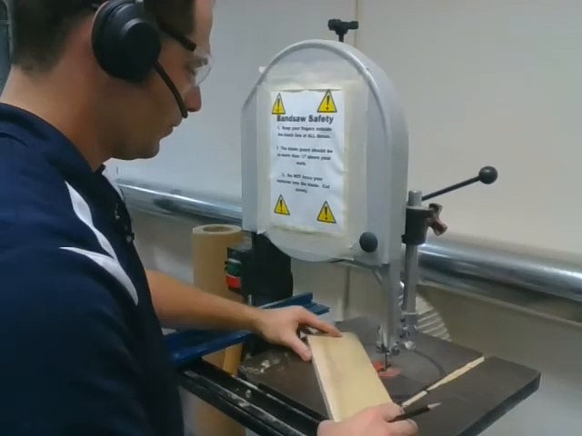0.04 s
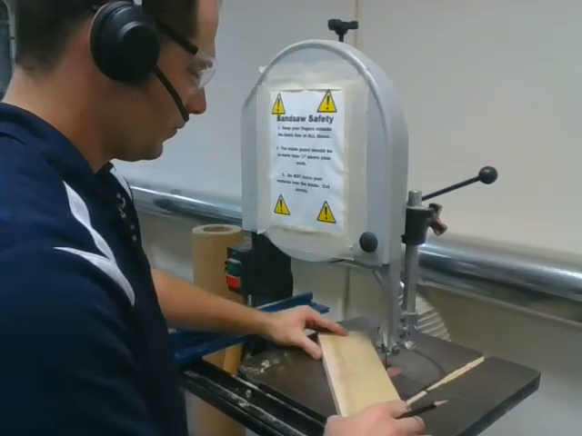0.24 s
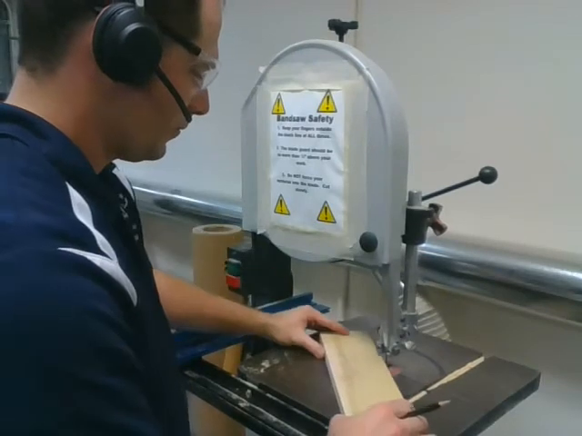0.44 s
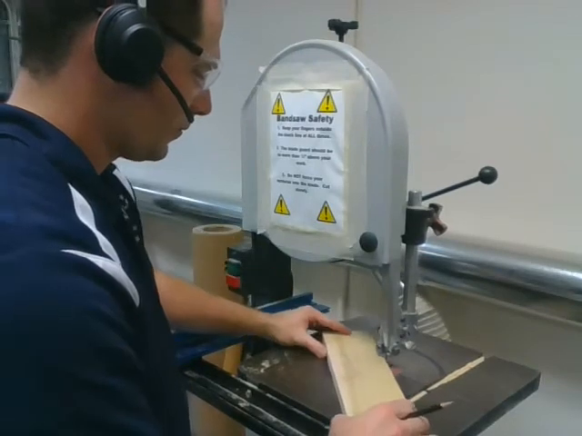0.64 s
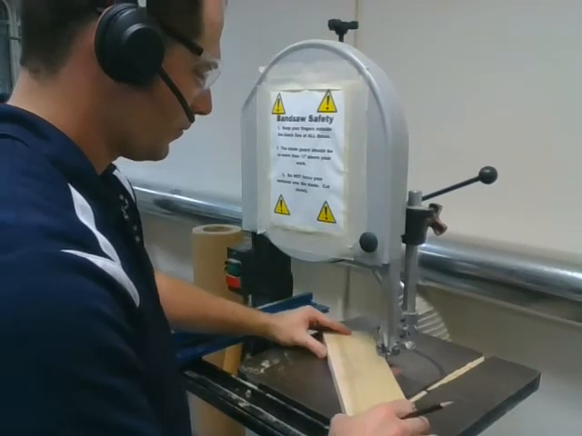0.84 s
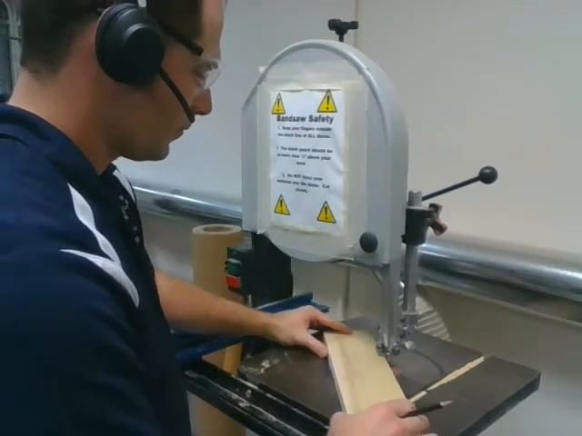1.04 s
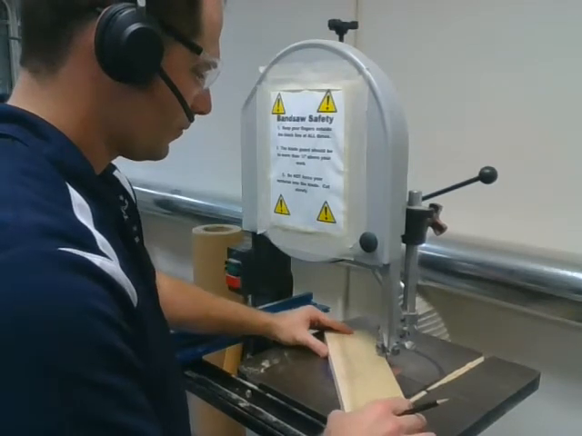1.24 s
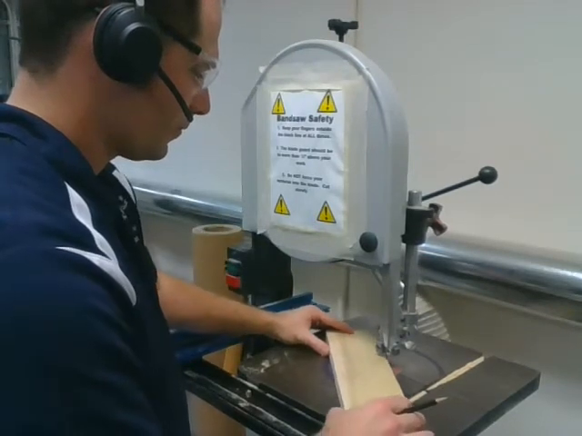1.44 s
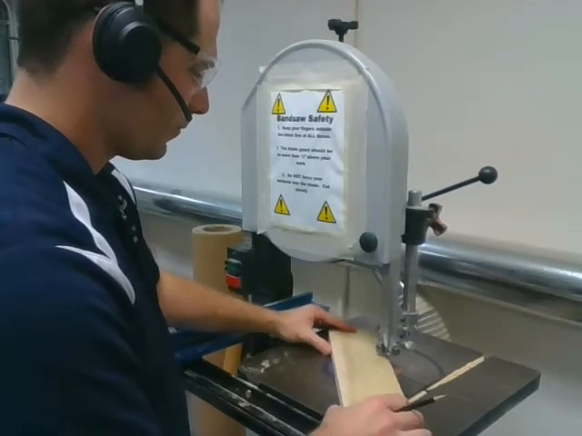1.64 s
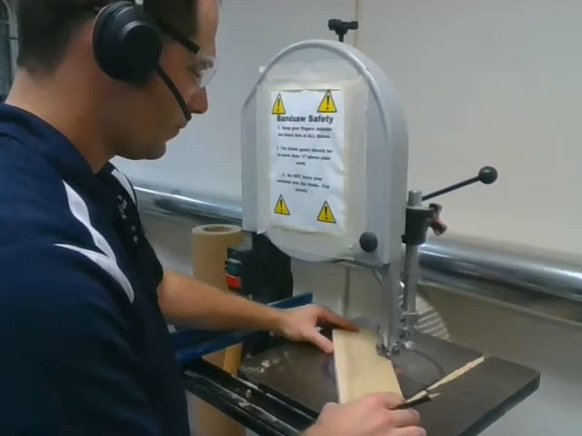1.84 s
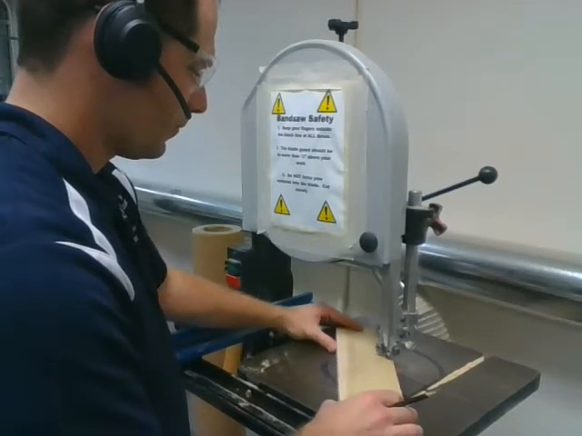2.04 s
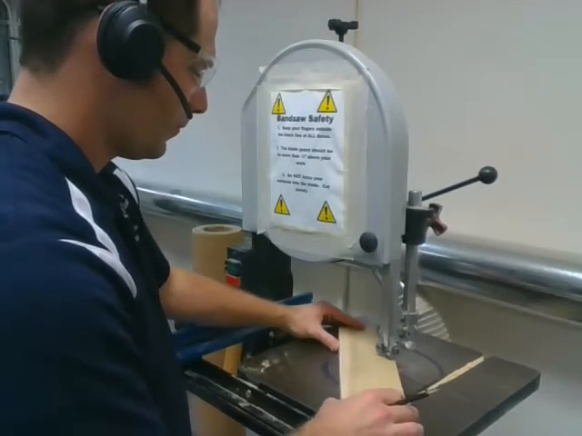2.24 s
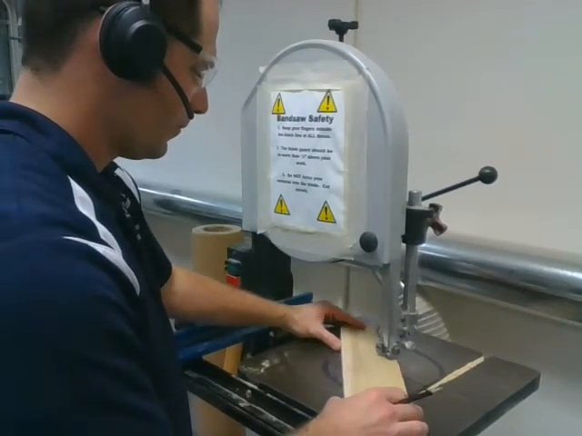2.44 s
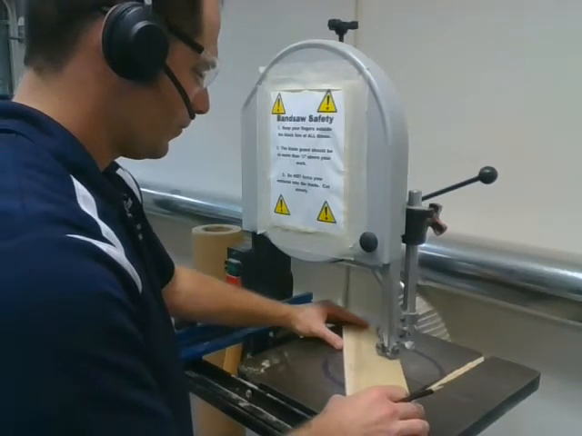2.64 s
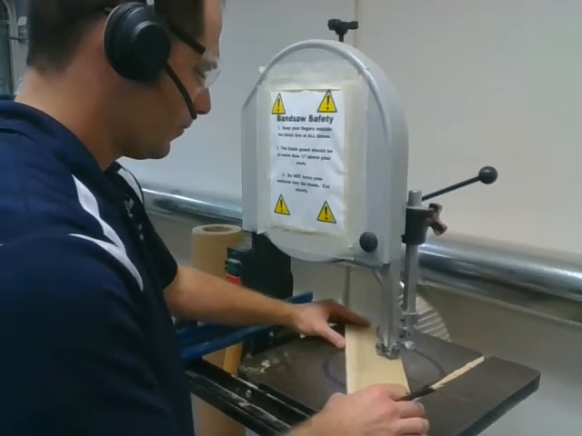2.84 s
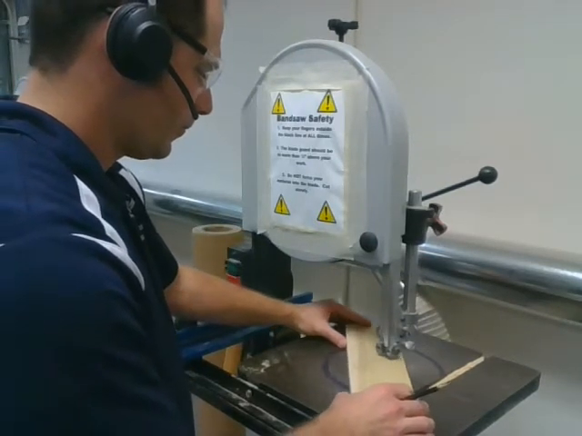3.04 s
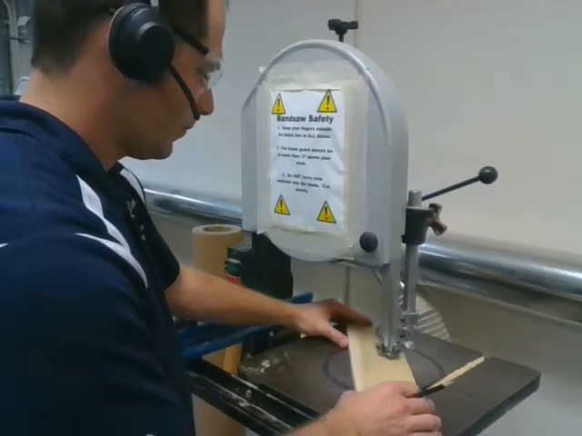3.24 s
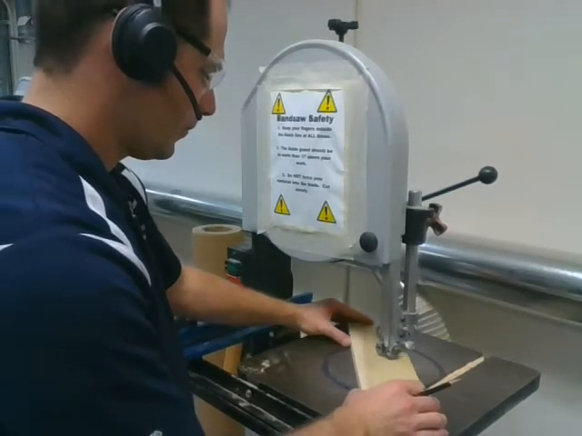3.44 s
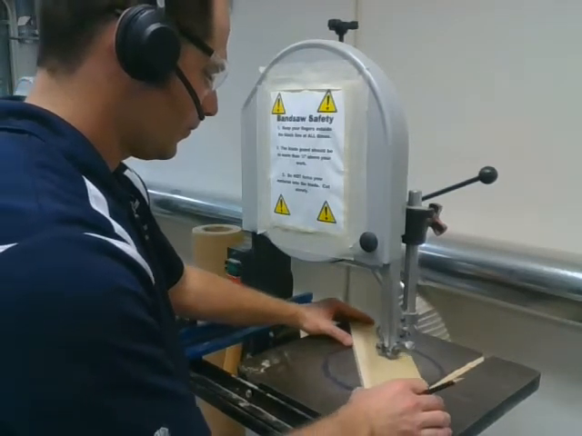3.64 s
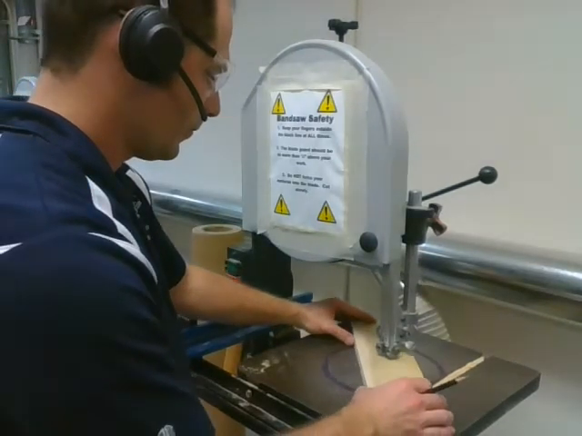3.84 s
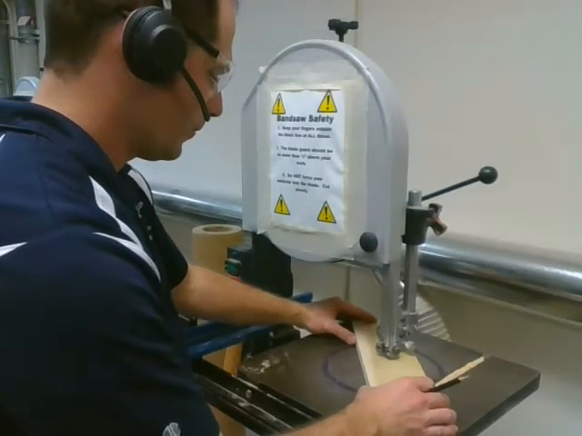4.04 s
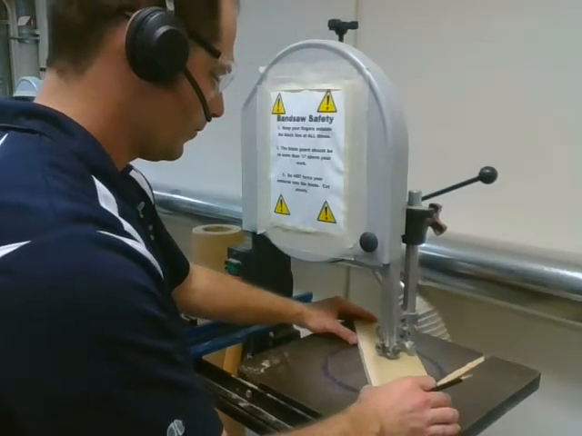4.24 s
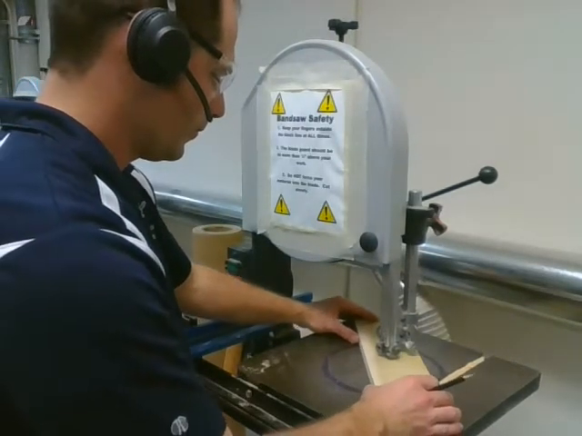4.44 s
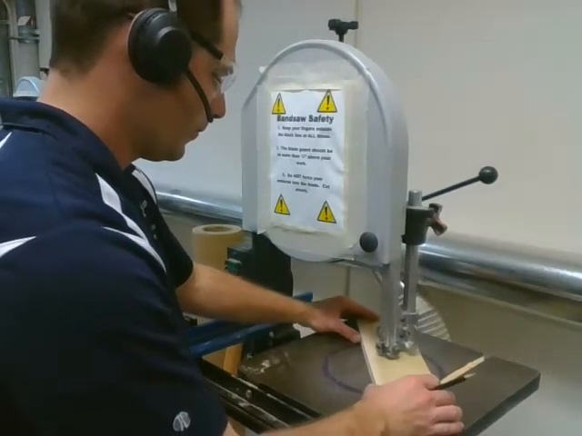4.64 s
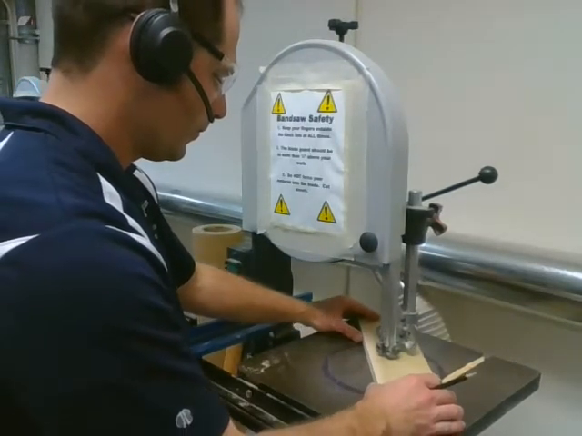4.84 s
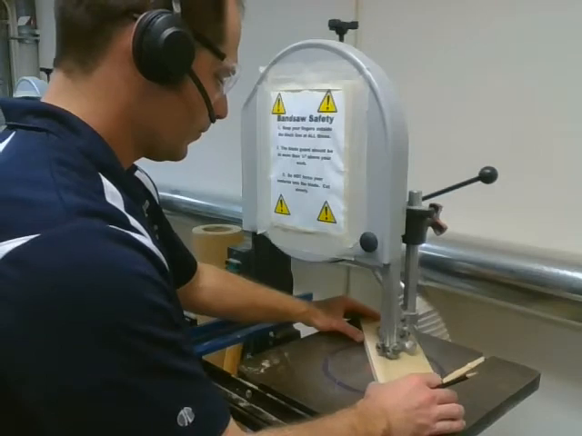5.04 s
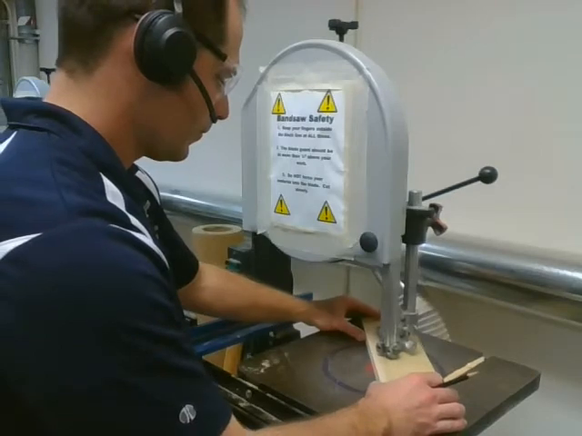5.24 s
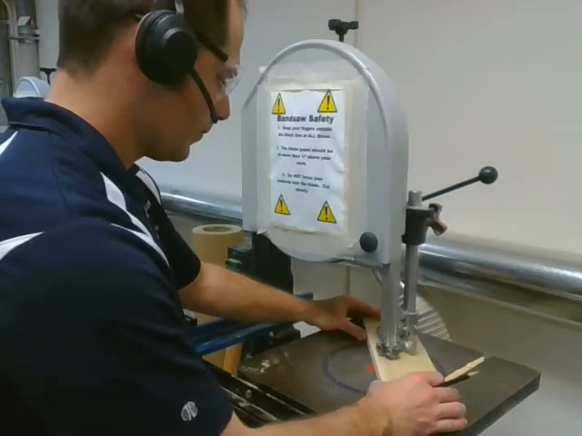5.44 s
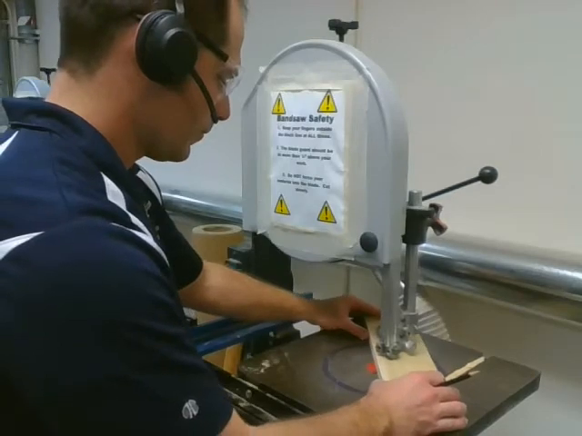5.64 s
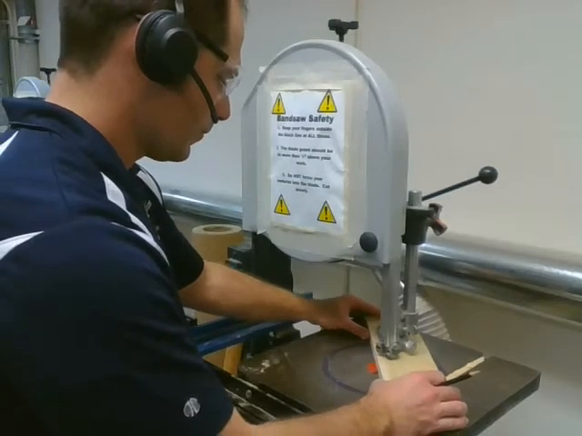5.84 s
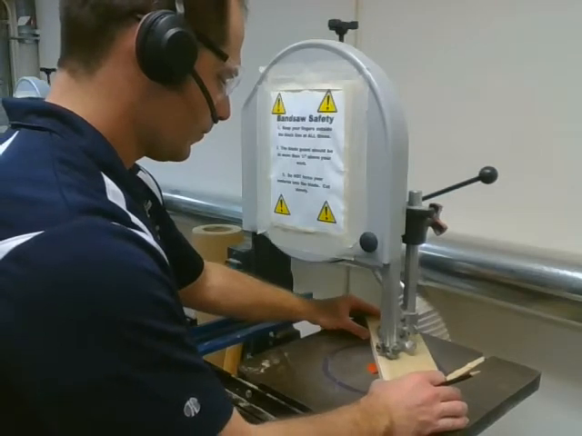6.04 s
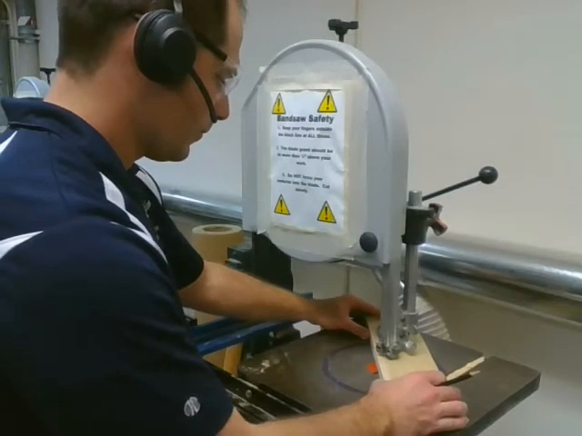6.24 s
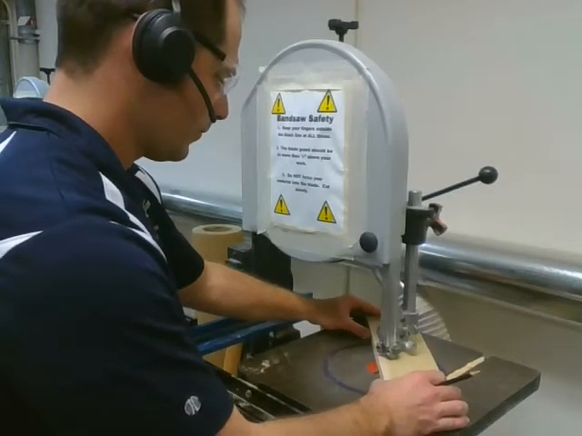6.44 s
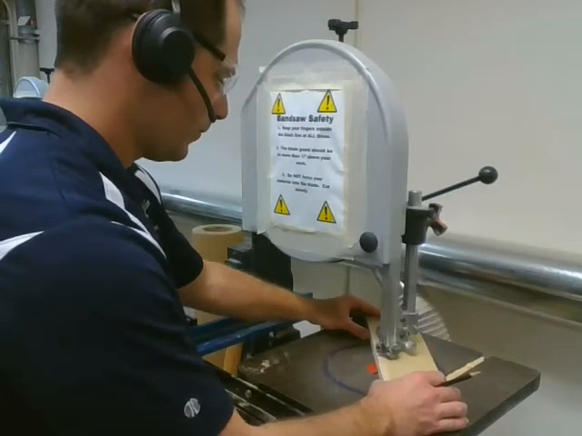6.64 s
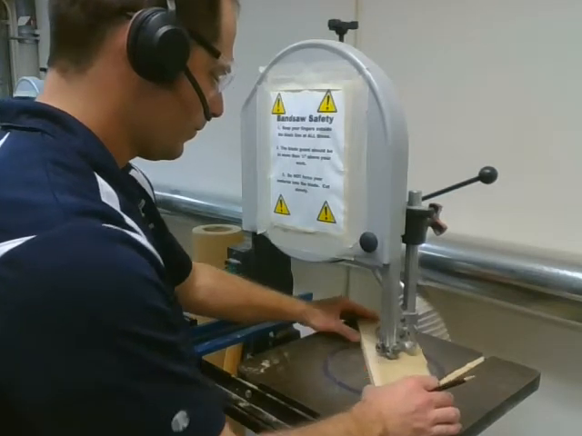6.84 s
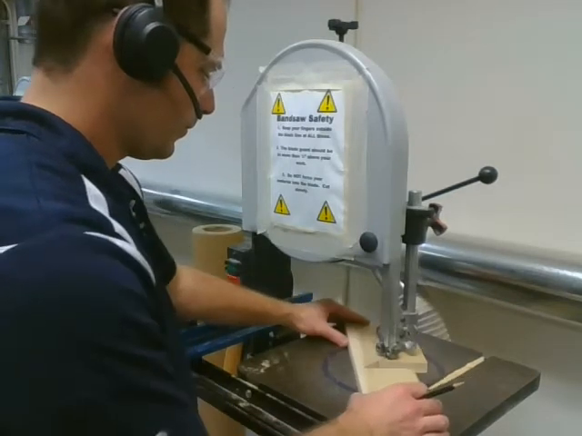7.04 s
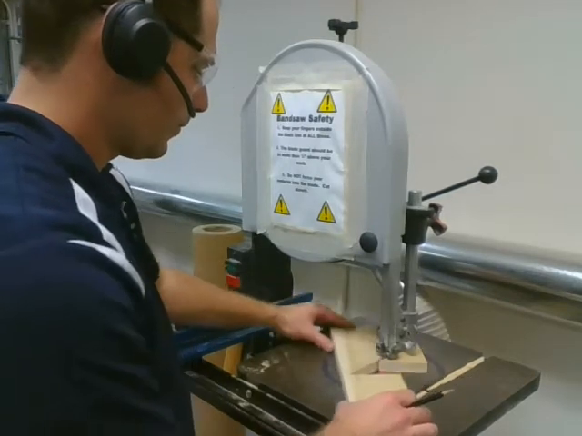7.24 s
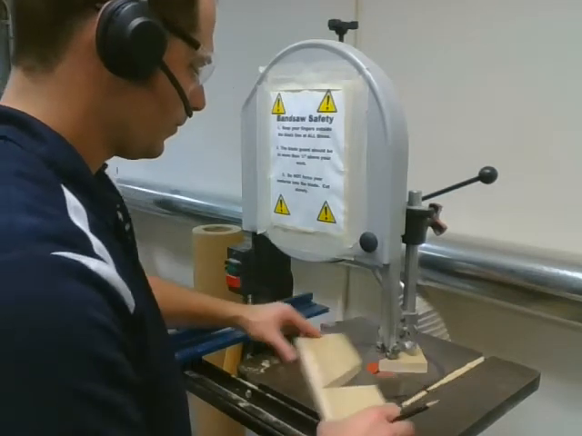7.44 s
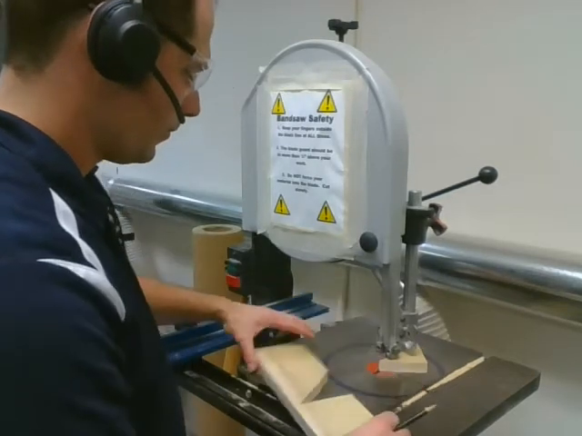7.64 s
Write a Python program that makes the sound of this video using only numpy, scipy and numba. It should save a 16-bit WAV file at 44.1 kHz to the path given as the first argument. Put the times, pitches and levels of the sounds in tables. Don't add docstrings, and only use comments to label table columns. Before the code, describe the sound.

For the first second a bandsaw idles faintly: muffled motor rumble, a mid whine, soft throbbing, and a few tiny chip ticks between 0.2 and 0.85. At about 1.0 the teeth touch a wooden board, and by 1.4 the cut is loud, a rough chattering rasp with ringing metallic resonances. Sharp catches crowd 1.45 to 2.3, with dull board thuds from 1.5 to 2.2, hardest near 2.07. The rasp dips, then surges around 2.9 to 3.7 over a low wooden drone. From 3.8 it eases to a thin singing hiss, the rumble nearly vanishing after 4.2, with stray snags. At 5.46 it abruptly roars back, scratchy and snagging, with a wavering high whistle swelling near 6.1 and fading by 6.5. Between 6.85 and 7.2 small squeaks mark the board pulling free; motor rumble remains until 7.7. The sound is close, thin and narrow-band.

```python
import sys
import numpy as np
from scipy import signal
from scipy.fft import rfft, irfft
from scipy.io import wavfile
from scipy.ndimage import uniform_filter1d
from numba import njit

SR = 44100
rng = np.random.default_rng(int(sys.argv[2]) if len(sys.argv) > 2 else 0)


def ratio(d):
    e = np.asarray(d, float) / 20
    return 10 ** e


def unload_wav(signal):
    wavfile.write(
        sys.argv[1],
        SR,
        np.round(np.clip(np.atleast_2d(signal).T, -1, 1) * 32767).astype(np.int16),
    )


N = 339761
T = np.arange(N) / SR
CUT_START_S, SECOND_PUSH_S = 0.98, 5.46


def level(x):
    return x / np.sqrt(np.mean(x ** 2))


def read(table):
    s, *columns = np.transpose(table)
    return [np.interp(T, s, c) for c in columns]


@njit
def svf(x, hz, width_hz):
    y, band, low = np.empty(len(x)), 0., 0.
    for i in range(len(x)):
        g, k = np.tan(np.pi * hz[i] / SR), width_hz / hz[i]
        v = (band + g * (x[i] - low)) / (1 + g * (g + k))
        band = 2 * v - band
        low += 2 * g * v
        y[i] = k * v
    return y


def ring(x, hz, width_hz):
    hz = hz * np.ones(N)
    return svf(svf(x, hz, 1. * width_hz), hz, 1. * width_hz)


def tone(hz):
    return np.sin(2 * np.pi * np.cumsum(hz) / SR)


def coloured(x, spectrum):
    hz, db = np.transpose(spectrum)
    log_hz = np.log(np.fft.rfftfreq(N, 1 / SR) + 1)
    gain = ratio(np.interp(log_hz, np.log(hz), db, left=-120, right=-120))
    return level(irfft(rfft(x) * gain, N))


def highpass(x, hz):
    return signal.sosfilt(signal.butter(2, hz, "high", fs=SR, output="sos"), x)


def walk(rate_hz):
    k = int(SR / rate_hz)
    held = np.repeat(rng.standard_normal(N // k + 1), k)
    return level(uniform_filter1d(uniform_filter1d(held, k), k)[:N])


def blows(events, rise_s, grit_share, grit_hz, db_up):
    out = np.zeros(N + SR)
    t = np.arange(SR // 25) / SR
    shape = t / rise_s * np.exp(1 - t / rise_s)
    grit = level(ring(rng.standard_normal(N), grit_hz, 1.1 * grit_hz))
    for s, db, hz in events:
        i = int(s * SR)
        body = np.sin(2 * np.pi * hz * t) + grit_share * grit[i:i + len(t)]
        out[i:i + len(t)] += ratio(db + db_up) * shape * body
    return out[:N]


def wheel():
    turn_hz, top_s = 5.22, 2.81
    return np.cos(2 * np.pi * turn_hz * (T - top_s))


# (time [s], extra feed [dB], length [s])
LURCHES = [(1.49, 3, .03), (2.063, 6.5, 0.039), (2.934, 5.5, 0.032), (3.08, 0.5, 0.036), (3.195, -3, .04),
           (3.227, 3, 0.017), (3.583, -3, 0.089), (3.692, 3, 0.0092), (5.48, 5, .01), (6.842, 5, .05),
           (6.92, -11, 0.023), (7.218, 4.5, 0.017)]


def lurch_db():
    return sum(db * np.exp(-((T - s) / length_s) ** 2) for s, db, length_s in LURCHES)


# (time [s], feed pressure as blade level [dB], span ring [Hz],
# lean on guide [dB], song share [dB])
FEED = [(0.98, -83, 2755, 3, -8), (1.12, -48, 2720, -5.5, -3.5), (1.4, -32.5, 2750, 1.5, -5),
        (1.79, -32, 2730, 1.5, -5), (2.06, -32, 2710, -1, -4), (2.35, -37, 2670, -2.5, -1.5),
        (2.78, -40, 2670, -14, -2.5), (2.95, -36, 2673, -13.5, 1), (3.47, -32.5, 2657, -15, -5.5),
        (3.84, -45, 2730, -18, -7), (4.39, -52.5, 2850, 2, -1), (4.84, -48, 3010, -1, -1.5),
        (5.45, -45, 2533, -3, -2.5), (5.47, -34.5, 2560, -4.5, 3.5), (5.84, -32.5, 2580, -2.5, 5),
        (6.07, -39.5, 2825, -6, 0.5), (6.42, -41.5, 2745, -3, -1), (6.72, -50.5, 2894, -6, -7.5),
        (7.03, -41, 2740, -14.5, -17),
    (7.19, -44.5, 2735, -7.5, -17),
    (7.25, -64.5, 2550, -7, 3.5),
    (7.7, -77.5, 2570, -4.5, 11),
]


def cut():
    feed_db, span_hz, lean_db, song_db = read(FEED)
    lurch = lurch_db()
    return feed_db + lurch, span_hz, lean_db, feed_db + 0.72 * lurch + song_db


# (time [s], level [dB])
RASP = [(0.98, -99), (1.12, -60.5), (2.1, -50.5), (2.46, -55.5), (4.4, -56.5), (5.45, -54), (5.46, -34),
        (5.85, -28.5), (6.06, -35.5), (6.45, -37.5), (6.56, -39), (6.61, -46.5), (7.7, -59)]


def rasp_db():
    return read(RASP)[0]


# (time [s], rumble [dB], bass share [dB])
GATE = [(0.0, -66.5, -18), (0.62, -63, -19), (1.09, -69.5, -34), (1.33, -57.5, -29), (1.5, -52.5, -13),
        (1.77, -52.5, -7), (2.07, -47, -10), (2.69, -52.5, -10), (2.92, -45, -8.5), (3.29, -46, -13.5),
        (3.92, -56.5, -14.5), (4.16, -60.5, -14), (4.18, -76, -13), (5.2, -80.5, -20), (5.45, -80, -22),
        (5.46, -47.5, -15.5), (5.9, -46, -15), (7.7, -48, -31)]


def gate():
    return read(GATE)


# (frequency [Hz], level [dB per Hz])
RUMBLE = [(180, -34.5), (300, -9), (329, -16.5), (455, -6), (534, -3.5), (589, -5), (739, -3.5),
          (928, -5.5), (1300, -14.5), (1690, -60.5), (2860, -120)]
BASS = [(15, -42.5), (25, -31), (70, -31), (113, -20), (146, -19.5), (189, -15), (290, -4.5), (380, -35.5),
        (640, -120)]
IDLE_HISS = [(710, -31), (1200, -11), (1950, -9), (2130, -21.5), (2380, -9.5), (3020, -9.5), (3500, -14),
             (4210, -14.5), (5290, -27), (7000, -27), (9100, -58.5), (15400, -120)]
# (frequency [Hz], level [dB], width [Hz])
WHINE = [(538.4, -1.5, 4.8), (716, -4, 28), (760, -9, 31), (936.4, -4.5, 18)]


def machine():
    rumble_db, bass_db = gate()
    second_push = T > SECOND_PUSH_S
    flutter_db = 2.5 * (rumble_db < -74)
    throb_hz, throb_peak_s, bite_s = 4.15, 0.2, 1.12
    throb_db = 2.5 * np.cos(2 * np.pi * throb_hz * (T - throb_peak_s)) * (T < bite_s)
    noise = rng.standard_normal((4, N))

    sway_db = (2.5 - 1.1 * second_push + flutter_db) * walk(11)
    rumble = ratio(sway_db + 0.2 * wheel() + throb_db) * coloured(noise[0], RUMBLE)

    whine = sum(ratio(db + 1.5 * flutter_db * walk(10)) * level(ring(noise[1], hz, width_hz))
                for hz, db, width_hz in WHINE)
    whine = whine + 0.5 * ratio(flutter_db * walk(9)) * tone(540 + 1.57 * walk(4))

    hum_db = -19 - 16 * second_push + 1.5 * walk(5)
    hum = np.sin(2 * np.pi * 120 * T) * ((1 + wheel()) / 2) ** 2 * ratio(hum_db)
    bass = ratio(3.6 * walk(14)) * coloured(noise[2], BASS)
    hiss = ratio(-12 + 1.1 * walk(45)) * coloured(noise[3], IDLE_HISS)

    buzz_db = -7.5 + 0.5 * cut()[3] + 0.5 * rasp_db()
    buzz = ratio(buzz_db - 3) * level(ring(noise[1], 1343, 330))
    mix = rumble + ratio(-5 + 1.1 * throb_db) * whine + ratio(bass_db) * bass + hum + ratio(0.35 * throb_db) * hiss
    return ratio(rumble_db - 1.5) * mix + buzz


def board():
    swell_s, rise_s, stop_s = 3.094, 0.43, 4.83
    sag_db_s, damp_db_s = 10.5, 116
    late_s = T - swell_s
    fall_db = np.where(late_s < 0, 10 * (late_s / rise_s) ** 2, sag_db_s * late_s)
    swell_db = -49 - fall_db - damp_db_s * np.maximum(T - stop_s, 0)
    size = ratio(swell_db) + ratio(gate()[0] - 13)
    drone = 1.5 * tone(335 + 4 * walk(15))
    rough = 0.96 * level(ring(rng.standard_normal(N), 335, 61))
    return ratio(-4.5) * size * (drone + rough)


# (time [s], peak [dB], ring [Hz])
TICKS = [
    (0.1989, -72.5, 2980),
    (0.2818, -75, 2940),
    (0.4678, -65, 2440),
    (0.5786, -69, 2440),
    (0.6449, -67, 2980),
    (0.7322, -68, 2580),
    (0.7756, -66, 3050),
    (0.834, -66, 2970),
]


def ticks():
    return blows(TICKS, 0.0016, 0.27, 3200, -2.5)


def teeth(depth_db):
    bites = rng.standard_normal(N) * ratio(1.5 * np.minimum(rng.exponential(size=N), 5))
    chatter_hz = 80.4 * (1 + 0.031 * walk(6))
    swing = 0.72 * tone(chatter_hz) + 0.5 * walk(90) + 0.35 * walk(22)
    gain = ratio(np.clip(depth_db, 0, 12) * swing)
    return level(bites) * gain / np.sqrt(uniform_filter1d(gain ** 2, SR // 6))


# (frequency [Hz], width [Hz], boost [dB])
FRAME = [(1340, 15, -2), (1310, 20, -7), (1640, 47, 1), (1630, 40, -0.5), (1787, 21, -5), (1783.5, 22, 6.5),
         (1810, 7.7, 3.5), (1940, 38, 11), (2462, 46, 8), (2670, 48, 2), (2850, 40, 4.5), (3027, 54, 8.5),
         (3290, 12, 5), (3400, 120, -0.5), (3732, 37, 7.5), (4320, 9.9, -12.5), (4740, 16, -8.5),
         (6695, 310, 15)]


def frame(x):
    out = x
    for hz, width_hz, db in FRAME:
        out = out + (ratio(db) - 1) * ratio(3.1 * walk(2.633)) * svf(x, np.full(N, 1. * hz), 1. * width_hz)
    return out


# (frequency [Hz], level [dB per Hz])
DUST = [(530, -34), (900, -6), (1020, 0), (1220, -21), (1330, 3), (1690, -3.5), (1860, -25.5), (2050, 2),
        (2890, 0), (4120, -1.5), (5490, -3.5), (6630, -12), (7110, -3.5), (9240, -61.5), (15600, -120)]
# (time [s], frequency [Hz], share [dB])
GUARD = [(2.3, 5520, -18), (2.55, 5580, -3.5), (3.0, 5300, -1.5), (3.5, 5280, 1), (3.7, 5190, -15),
         (4.5, 5250, -10), (5.95, 5360, -18), (6.25, 5630, -8), (6.6, 5420, -15.5)]


def dust_rasp(force, steady, lean_db):
    edge_quiet_s, bearing_end_s = 6.02, 3.66
    edge_db = -4.5 + 0.56 * lean_db - 2.88 * (T > SECOND_PUSH_S) - 4.2 * (T > edge_quiet_s)
    slide_s = np.clip(T - SECOND_PUSH_S - 0.1, 0, edge_quiet_s - SECOND_PUSH_S)
    edge = ratio(edge_db + 4) * level(ring(force, 4740 - 450 * slide_s, 330))
    guard_hz, guard_db = read(GUARD)
    guard = ratio(guard_db) * level(ring(force, guard_hz, 300))
    bearing = ratio(-11.5) * (T < bearing_end_s) * level(ring(steady, 5720 + 28 * wheel(), 40))
    rasp = coloured(steady, DUST) + edge + guard + bearing
    return ratio(rasp_db() - 2 + 0.52 * lurch_db()) * rasp


# (time [s], song [Hz], guide [Hz])
SONG = [(0.98, 1853, 3400), (1.45, 1751, 3313), (3.86, 1770, 3330), (4.05, 1798, 3500), (4.55, 1810, 3435),
        (4.95, 1820, 3284), (5.45, 1825, 3080), (5.47, 1816, 3345), (5.83, 1810, 3290), (6.15, 1872, 3490),
        (6.74, 1835, 3420)]


def blade():
    span_db, span_hz, lean_db, song_db = cut()
    song_hz, guide_hz = read(SONG)
    chatter_db = 4
    force, steady = teeth(chatter_db), teeth(0.54 * chatter_db)

    shoulder = ratio(-8 - 0.44 * lean_db) * level(ring(force, 1608, 130))
    song = 0.8 * level(ring(steady, song_hz, 140)) + 0.48 * level(ring(steady, song_hz, 35)) + shoulder

    span = level(ring(force, span_hz, 290)) + ratio(-13) * level(ring(steady, 2175, 420))
    squeal_s = 6.76
    squeal = ratio(-1.5) * level(ring(steady, 1.02 * span_hz, 170))
    span = np.where(T < squeal_s, span, 0.75 * span + squeal)

    guide = level(ring(force, guide_hz, 290))
    rings = ratio(song_db - 3.5) * song + ratio(span_db - 3.5) * span + ratio(span_db + lean_db - 2.5) * guide
    contact = np.clip((T - CUT_START_S) / 0.033, 0, 1)
    return frame(contact * (rings + dust_rasp(force, steady, lean_db)))


# (time [s], peak [dB], ring [Hz])
CATCHES = [(1.183, -28, 3320), (1.3408, -25, 3290), (1.392, -20, 3345), (1.4535, -23.5, 3400),
           (1.465, -16.5, 3330), (1.4999, -10.5, 3360), (1.517, -17, 3350), (1.5437, -14, 3290),
           (1.5892, -23.5, 3510), (1.6261, -18, 3290), (1.6485, -14, 3350), (1.7127, -11.5, 3310),
           (1.7408, -18, 3290), (1.7619, -18.5, 3454), (1.7873, -18, 3285), (1.835, -19, 3420),
           (1.8904, -17, 3350), (1.9962, -16, 3344), (2.122, -15, 3335), (2.1924, -16, 3314),
           (2.2547, -18, 2660), (2.2914, -19.5, 2660), (2.3304, -23.5, 3400), (2.576, -22.5, 2670),
           (3.0309, -23, 2720), (3.1597, -22.5, 2670), (3.279, -22.5, 2510), (3.355, -23.5, 2740),
           (3.6874, -25, 2640), (3.8827, -31.5, 2790)]


def catches():
    return blows(CATCHES, 0.0021, 0.18, 2320, -4.0)


# (time [s], peak [dB], pitch [Hz])
THUDS = [
    (1.5, -35, 240),
    (1.644, -39, 300),
    (1.713, -32, 344),
    (1.995, -39, 266),
    (2.051, -43.5, 265),
    (2.066, -28, 227),
    (2.189, -41, 207),
]


def thuds():
    mode_1 = blows(THUDS, 0.0011, 0.67, 540, 1.3)
    mode_2 = blows(THUDS * np.array([1, 1, 2.6]), 0.0018, 0.74, 990, -2.1)
    bounce = blows(THUDS * np.array([1, 1, 0.48]), 0.0016, 0.1, 150, -7.0)
    return highpass(ring(mode_1 + mode_2 + bounce, 360, 2000), 95)


# (time [s], peak [dB], ring [Hz])
SNAGS = [(4.503, -29, 3070), (4.562, -39, 3080), (4.813, -29, 3150), (5.032, -26, 3000),
         (5.255, -28.5, 2950), (5.2942, -26, 2950), (5.4595, -26, 3020), (5.465, -16.5, 2350),
         (5.528, -14.5, 3010), (5.5623, -18.5, 2460), (5.6102, -16, 2900), (5.6251, -19.5, 2410),
         (5.6341, -10, 2470), (5.686, -11.5, 3010), (5.7683, -23.5, 2580), (5.7824, -14.5, 2420),
         (5.8237, -16, 3200), (5.887, -17.5, 3180)]


def snags():
    return blows(SNAGS, 0.0012, 0.38, 2600, -5.5)


def whistle():
    swell_s, break_s, fade_s, fade_db_s = 6.08, 6.168, 6.33, 69
    pure = tone(1886 + 9 * walk(30)) * ratio(0.83 * walk(34))
    db = -40.5 + 4.5 * np.clip((T - swell_s) / 0.042, 0, 1)
    db = db - fade_db_s * np.maximum(T - fade_s, 0)
    db = db - 16 * np.exp(-((T - break_s) / 0.016) ** 2)
    return ratio(db + 3.0) * pure * (T > SECOND_PUSH_S)


# (time [s], peak [dB], ring [Hz])
SQUEAKS = [
    (6.857, -34.5, 3000),
    (6.8737, -34, 2940),
    (6.9551, -34.5, 2730),
    (7.011, -31, 2720),
    (7.0217, -27.5, 2750),
    (7.1045, -29.5, 2600),
    (7.1899, -29, 2690),
    (7.198, -29.5, 2660),
    (7.2073, -30.5, 2750),
]


def squeaks():
    return blows(SQUEAKS, 0.0017, 0.2, 3700, -1.2)


def scene():
    idle = machine() + board() + ticks()
    cutting = blade() + catches() + thuds()
    return (idle + cutting + snags() + whistle() + squeaks())[None]


def low_pass(x):
    return signal.sosfilt(signal.butter(12, 15676, fs=SR, output="sos"), x)


def record(dry):
    camera_hz, widen_s = 16000, 5.68
    thin = highpass(dry, 85)
    tight, wide = (signal.sosfilt(signal.cheby2(9, 55, hz, fs=SR, output="sos"), thin) for hz in (7750, 8050))
    narrow = np.where(T < widen_s, tight, wide)
    mirror = wide * np.cos(2 * np.pi * camera_hz * T)
    leak = coloured(mirror[0], [(8500, -0.5), (8900, 37.5), (9300, 23), (10500, 11), (11500, 6.5), (13300, 0.5),
                                (14500, 2), (15600, -9)])
    treble = uniform_filter1d(np.abs(ring(narrow[0], 5000, 2500)), SR // 200)
    grit = ratio(-46) * treble * level(ring(rng.standard_normal(N), 8200, 1500)) * (T < widen_s)
    hiss = ratio(-101) * rng.standard_normal(N)
    return low_pass(narrow + ratio(-82.5) * leak + grit + hiss)


dry = scene()
out = record(dry)
unload_wav(out)
```